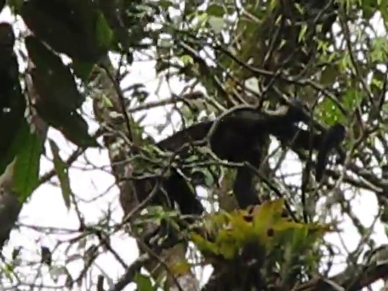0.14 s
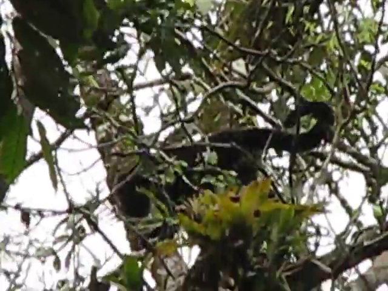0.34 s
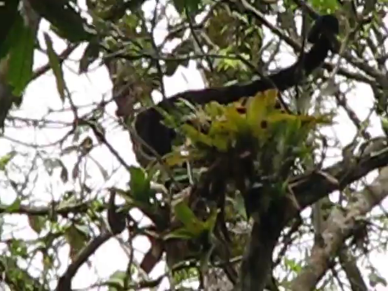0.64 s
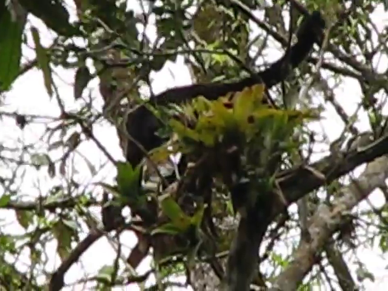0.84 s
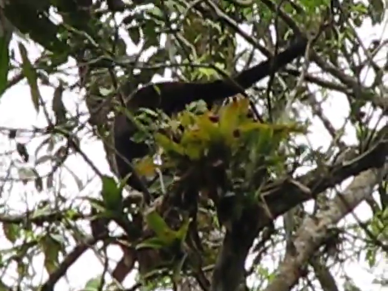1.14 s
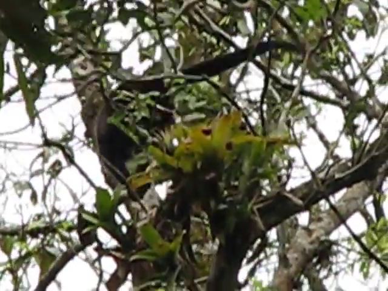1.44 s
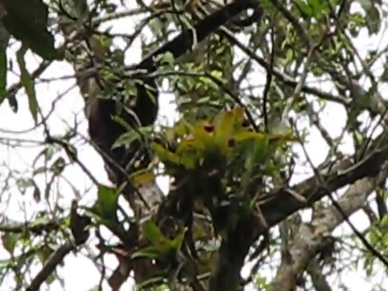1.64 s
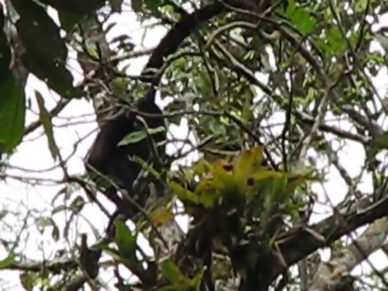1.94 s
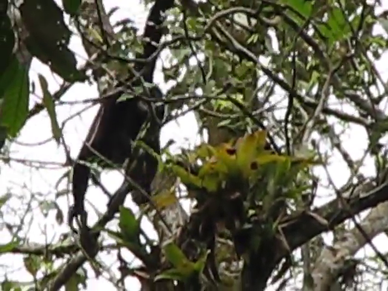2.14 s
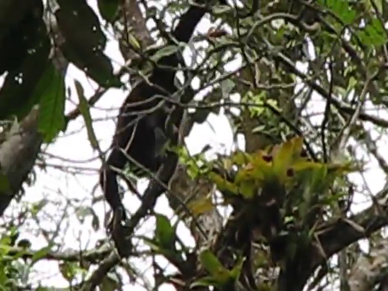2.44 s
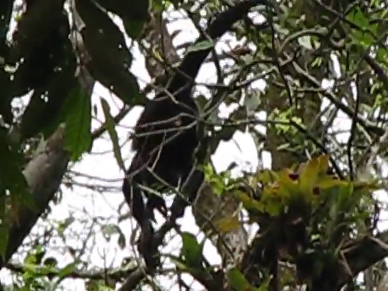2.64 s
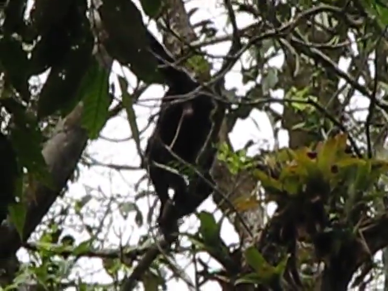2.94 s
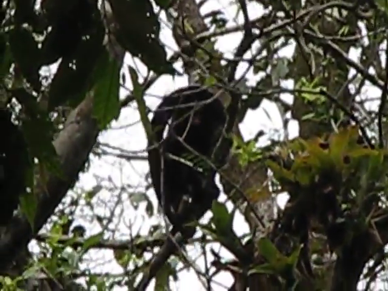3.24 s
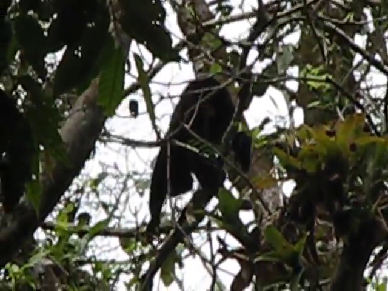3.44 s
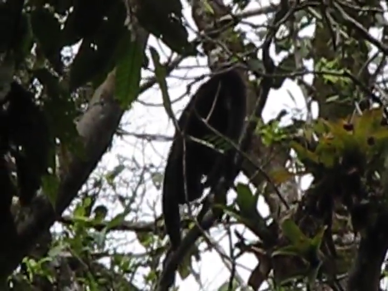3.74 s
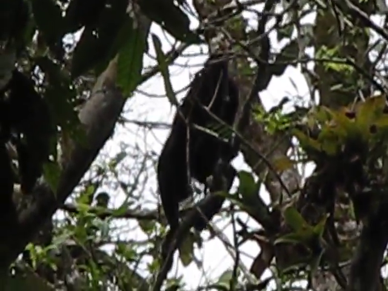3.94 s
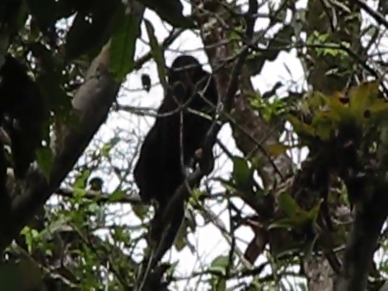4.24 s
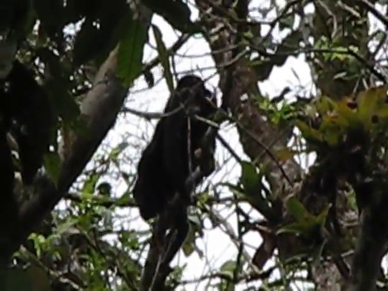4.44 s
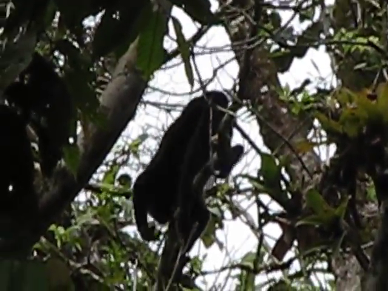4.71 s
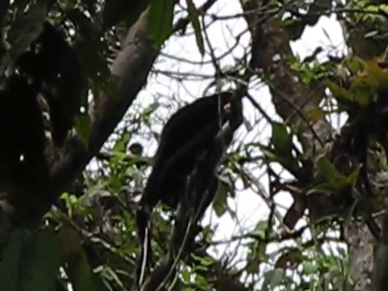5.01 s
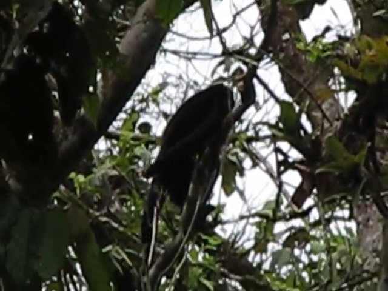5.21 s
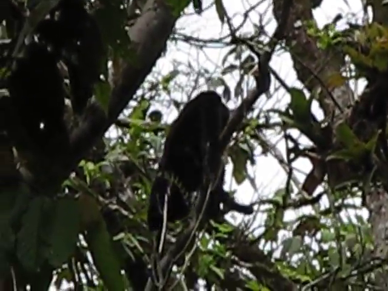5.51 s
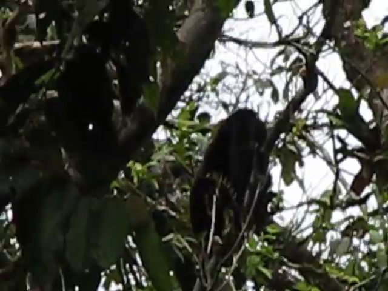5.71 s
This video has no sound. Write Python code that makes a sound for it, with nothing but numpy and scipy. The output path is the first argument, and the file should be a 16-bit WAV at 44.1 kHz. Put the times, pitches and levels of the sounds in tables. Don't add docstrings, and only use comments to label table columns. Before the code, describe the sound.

Throaty hollow monkey roars come in two bouts with gasps and whoops between, echoing through a forest of hissing cicadas, cricket and frog.

```python
import sys
import numpy as np
from scipy import signal
from scipy.fft import rfft, irfft, next_fast_len
from scipy.io import wavfile
from scipy.ndimage import uniform_filter1d, map_coordinates

SR = 44100
rng = np.random.default_rng(int(sys.argv[2]) if len(sys.argv) > 2 else 0)


def decibels_to_gain(level_db):
    exponent = np.asarray(level_db, float) / 20
    return 10 ** exponent


def generate_wav(signal):
    frames = np.transpose(np.atleast_2d(signal))
    scaled = np.clip(frames, -1, 1) * 32767
    pcm = np.round(scaled).astype(np.int16)
    wavfile.write(sys.argv[1], SR, pcm)


N = 258867


def unit(x):
    return x / np.sqrt(np.mean(x ** 2) + 1e-20)


def steady(x, span_s):
    power = abs(uniform_filter1d(x ** 2, int(span_s * SR)))
    return x / np.sqrt(power + 1e-20)


def along(points, hz):
    f, values = np.transpose(points)
    return np.interp(np.log(hz + 1), np.log(f + 1), values)


def curves(rows):
    times, *columns = np.transpose(rows)
    return [np.interp(np.arange(N) / SR, times, column) for column in columns]


def wobble(rate):
    knots = rng.standard_normal(int(N * rate / SR) + 4)
    return map_coordinates(knots, [np.arange(N) * rate / SR])


def filtered(x, response):
    m = next_fast_len(N + SR // 2)
    return irfft(rfft(x, m) * response(np.fft.rfftfreq(m, 1 / SR)), m)[..., :N]


def high_pass(x, hz, order):
    return filtered(x, lambda f: (1j * f / (hz + 1j * f)) ** order)


def modes(table):
    def response(f):
        total = 0
        for k, (centre, width, db) in enumerate(table):
            ring = 1j * f * width / (centre * centre - f * f + 1j * f * width)
            total = total + (-1) ** k * decibels_to_gain(db) * ring
        return total
    return response


def moving(x, hz, width_hz):
    turn = np.exp(2j * np.pi * np.cumsum(hz) / SR)
    pole = np.exp(-np.pi * width_hz / SR)
    low = signal.lfilter([1], np.convolve([1, -pole], [1, -pole]), x / turn)
    return (low * turn).real


# frequency_hz, likeness (1 same, 0 unrelated)
LEFT_RIGHT_LIKENESS = [(60, 1), (110, 0.93), (200, 0.96), (380, 0.94), (700, 0.77), (1290, 0.55),
                       (2380, 0.3), (4400, -0.062), (8120, -0.31), (15000, 0.03)]


def rush(spectrum, patchy_db):
    z = signal.stft(rng.standard_normal((2, N)), nperseg=512)[2]
    patches = uniform_filter1d(rng.standard_normal(z.shape[1:]), 6, 0)
    patches = uniform_filter1d(patches, 14, 1)
    pair = signal.istft(z * decibels_to_gain(patchy_db * unit(patches)), nperseg=512)[1][:, :N]

    def mid_side(hz):
        angle = np.arccos(np.clip(along(LEFT_RIGHT_LIKENESS, hz), -1, 1)) / 2
        return decibels_to_gain(along(spectrum, hz)) * [np.cos(angle), np.sin(angle)]

    mid, side = filtered(pair, mid_side)
    return unit(np.array([mid + side, mid - side]))


# frequency_hz, level_db (per Hz)
LEAVES_SPECTRUM = [(12, -55), (20, -1), (98, 0.5), (200, -1), (316, 1), (787, -1.5), (1130, -1.5),
                   (2210, -7), (2550, -4), (2880, -6.5), (4330, -3.5), (4650, 0), (5000, -4), (5500, -11),
                   (6200, -6.5), (8060, -56), (13600, -120)]
# frequency_hz, level_db (per Hz)
CICADA_SPECTRUM = [(3240, -65), (5600, -24), (7640, -2.5), (9400, 1), (10900, -4), (13700, -28.5),
                   (14800, -34), (15400, -31)]
# time_s, level_db
CICADA_LEVEL = [(0.0, -34.5), (0.46, -34), (2.26, -34.5), (5.87, -33.5)]
# pitch_hz, width_hz, level_db
DRONES = [
    (120.9, 4.9, -62),
    (2622, 44, -61),
]


def forest():
    cicada_db = curves(CICADA_LEVEL)[0] + 3.5 + 0.18 * wobble(4.42)
    cicadas = decibels_to_gain(cicada_db) * rush([(4000, -70), *CICADA_SPECTRUM], patchy_db=0.12)
    leaves = decibels_to_gain(-42.5 + 0.5 * wobble(1.75)) * rush(LEAVES_SPECTRUM, patchy_db=1.27)
    drones = np.zeros(N)
    for hz, width_hz, db in DRONES:
        ring = modes([(hz, width_hz, 0)])
        drones += decibels_to_gain(db) * unit(filtered(rng.standard_normal(N), lambda f: ring(f) ** 2))
    return cicadas + leaves + drones


# time_s, level_db
CRICKET_LEVEL = [(0, -47), (1.5, -51), (2.6, -49), (3.2, -53), (3.6, -56), (4.2, -54), (5.87, -54)]
CRICKET_RESTS = [.62, 1.22, 1.65, 1.97, 2.33, 2.67, 3.5, 4.08, 5.398]


def cricket():
    rest_s, pitch_hz = .024, 5020
    t = np.arange(N) / SR
    stroke = np.cumsum(52 * (1 + 0.0253 * wobble(2.5))) / SR
    pulses = np.sin(np.pi * stroke) ** 2 * decibels_to_gain(2.5 * wobble(45))
    scramble = 1.8 * wobble(70) + [.5 * wobble(30), .5 * wobble(30)]
    carrier = np.sin(2 * np.pi * pitch_hz * t + scramble)
    singing = np.prod([1 - 1.2 * np.exp(-((t - s) / rest_s) ** 4) for s in CRICKET_RESTS], axis=0)
    swaying = decibels_to_gain(.5 * wobble(3.74))
    song = unit(filtered(singing * pulses * carrier, modes([(5000, 99, 0)])))
    return decibels_to_gain(curves(CRICKET_LEVEL)[0]) * swaying * song


# time_s, rasps_so_far (count)
FROG_RHYTHM = [(.08, 0), (1.97, 10), (3.14, 16), (3.95, 20), (4.91, 25), (5.87, 30)]


def frog():
    beat = np.cos(np.pi * curves(FROG_RHYTHM)[0]) ** 6
    rasp = rush([(2800, -35), (3400, 6.5), (3900, 11.0), (4500, 9), (5000, -43)], patchy_db=0.5)
    return decibels_to_gain(-45 + wobble(2.15)) * beat * rasp * decibels_to_gain([[1.5], [-1.5]])


# start_s, peak_db
TWIG_SNAPS = [
    (4.327, -29),
]


def twig():
    x, t = np.zeros(N), np.arange(SR // 10) / SR
    for start, db in TWIG_SNAPS:
        burst = decibels_to_gain(db + 12.0 - 60 * t / 0.05) * rng.standard_normal(len(t))
        x[round(start * SR):][:len(t)] += burst
    wood = modes([(1950, 900, 0)])
    return filtered(x, lambda f: wood(f) ** 2)


def swell(start, end):
    at = np.arange(round(start * SR), round(end * SR))
    u = np.linspace(0, 1, len(at))
    return at, np.sin(np.pi * u ** .7) ** .8, u


# start_s, end_s, first_pitch_hz, width_hz, level_db
SQUEAKS = [
    (0, 0.094, 3440, 296, -46.5),
    (0.551, 0.683, 3810, 150.3, -48),
    (1.216, 1.381, 4210, 350, -43.5),
    (1.448, 1.86, 3680, 1097, -50.5),
]


def squeaks():
    x = np.zeros(N)
    for start, end, first_hz, width_hz, db in SQUEAKS:
        at, shape, u = swell(start, end)
        pitch = first_hz * 0.93 ** u
        x[at] += decibels_to_gain(db) * shape * unit(moving(rng.standard_normal(len(at)), pitch, width_hz))
    return x


# start_s, end_s, first_pitch_hz, level_db, favoured_hz
LINKS = [
    (0.122, 0.206, 261.4, -31, 880),
    (2.743, 2.85, 204.4, -43, 191),
    (4.41, 4.447, 172, -31.5, 840),
    (4.715, 4.775, 174.8, -33, 840),
    (5.022, 5.107, 257.5, -37, 520),
]
# start_s, end_s, first_pitch_hz, level_db, favoured_hz
WHOOPS = [
    (3.9, 3.985, 241, -29.5, 570.2),
    (4.37, 4.403, 245.3, -27.5, 777),
    (4.675, 4.728, 263.7, -27, 792),
]


def links():
    x, flutter, waver = np.zeros(N), wobble(40), wobble(25.54)
    notes = [(*row, 0.95 * row[2]) for row in LINKS]
    notes += [(*row, 285) for row in WHOOPS]
    for start, end, first_hz, db, favoured_hz, last_hz in notes:
        at, shape, u = swell(start, end)
        glide = np.minimum(1.78 * u, 1) ** 0.77
        pitch = (first_hz + (last_hz - first_hz) * glide) * (1 + 0.003 * flutter[at])
        phase = 2 * np.pi * np.cumsum(pitch) / SR
        for k in range(1, 6):
            weight = 0.3 * (k < 3) + 1 / (1 + ((k * pitch - favoured_hz) / 200) ** 4)
            x[at] += decibels_to_gain(db + 3.4 * waver[at]) * shape * weight * np.sin(k * phase)
    return x


def glottis(rate_hz, jitter, breath):
    cycle = np.cumsum(rate_hz * np.exp(jitter * wobble(90))) / SR
    slaps = (np.diff(np.floor(cycle), prepend=0) > 0) * decibels_to_gain(0.45 * rng.standard_normal(N))
    puffs = np.exp(-1.8 * (cycle % 1)) * rng.standard_normal(N)
    return np.sqrt(1 - breath) * unit(slaps) + np.sqrt(breath) * unit(puffs)


RISE_DB = 22


def breath_db(t, length, attack, sag, release):
    attack = max(attack, .005)
    rise = -RISE_DB * np.maximum(1 - t / attack, 0) ** 2
    held = np.clip(t - attack, 0, max(length - attack, 0))
    after = np.maximum(t - max(length, attack), 0)
    return rise - sag * held - release * after


# start_s, length_s, sac_db, mouth_db, sac_pitch_hz
BARKS = [
    (-.06, .115, -22, -26, 345),
    (.205, 0.1144, -15, -27, 347.9),
]
HOARSE = [
    (.45, .11, -22, -21.5, 373.6),
    (.745, 0.1203, -22, -27.5, 359.3),
    (.83, 0.14, -21.5, -25, 392.3),
    (1.2, 0.0787, -23, -29, 375.9),
]
SUNG = [
    (4.1, 0.0936, -17.5, -27, 332),
    (4.145, 0.099, -14, -26, 374),
    (4.46, 0.12, -12, -24, 374),
    (4.785, 0.16, -11, -23, 379),
    (5.11, 0.16, -11.5, -23, 370.4),
    (5.44, 0.1473, -11.5, -24, 378.1),
    (5.828, .15, -13.5, -26, 379.5),
]
GASPS = [
    (.13, .07, -33.5, -23, 380),
    (4.38, 0.042, -19, -33.5, 335.9),
    (4.695, 0.076, -22, -33, 327.5),
    (5.035, 0.051, -38.5, -25.5, 370),
]
AFTERS = [(.58, 0.078, -32, -31.5, 361.7), (1.52, .04, -47, -46, 384.8), (1.64, 0.09, -44, -44.5, 376),
          (1.85, 0.073, -51, -55, 380), (3.4, 0.0817, -45.5, -56, 350), (4.27, 0.0894, -28, -50, 371.7),
          (4.61, .05, -25.5, -63, 376.7), (5.34, 0.073, -37, -46, 363.3), (5.59, 0.04, -29, -32, 357),
          (5.68, 0.049, -35.5, -43, 368)]
YAPS = [
    (1.25, 0.1404, -20, -30, 366.2),
    (3.285, .07, -31, -41.5, 320.7),
    (3.58, 0.12, -26, -35, 344.3),
    (3.85, .11, -23, -31.5, 345.3),
]
# start_offset_hz, settling_s
SUNG_SCOOP = (-22, .03)
VOICES = [
    (BARKS, dict(sac=(.06, 16.4, 259.7), mouth=(0.054, 50, 250), rasp=(0.042, 60, 320), scoop=(8.034, 0.0382), clean=0.83, mouth_hz=711, opens=6.8, low_hz=2154, rasp_db=0.5, grows=0.13, hiss_db=-9.5)),
    (YAPS, dict(sac=(.06, 18.3, 264), mouth=(0.083, 22.4, 240), rasp=(0.12, 30, 280), scoop=(11.98, 0.0404), clean=0.41, mouth_hz=659, opens=3, low_hz=2055, rasp_db=-2.5, grows=1.5, hiss_db=-12)),
    (HOARSE, dict(sac=(0.049, -4.5, 218.4), mouth=(0.07, 59, 140), rasp=(0.095, 71, 260), scoop=(65, .06), clean=0.24, mouth_hz=739, opens=13, low_hz=2090, rasp_db=-3, grows=0.89, hiss_db=-1.5)),
    (SUNG, dict(sac=(0.089, 46, 303), mouth=(0.034, 93.6, 120), rasp=(0.067, 48, 188), scoop=SUNG_SCOOP, clean=0.98, mouth_hz=734.3, opens=6.6, low_hz=2028.5, rasp_db=-2.5, grows=2.9, hiss_db=-7.5)),
    (GASPS, dict(sac=(0.029, 40, 390), mouth=(0.01, 38, 140), rasp=(.03, 27.3, 102.5), scoop=(-17, 0.018), clean=.93, mouth_hz=854, opens=3.4, low_hz=2010, rasp_db=-3.5, grows=2.08, hiss_db=-12)),
    (AFTERS, dict(sac=(0.0302, 25, 200), mouth=(0.013, 90, 198), rasp=(0.037, 30, 130), scoop=(2.9, 0.021), clean=1, mouth_hz=762, opens=3, low_hz=2010, rasp_db=-3.5, grows=1.27, hiss_db=-6)),
]


def heaves():
    rasp_base_db, full_sac_db = -32, -15
    sings_hz_per_db = 1.5
    easy_db = -30
    lock_s, loose = .045, .3
    power, colour = np.full((4, N), 1e-12), np.zeros((4, N))
    for rows, voice in VOICES:
        scoop_hz, settle_s = voice["scoop"]
        for start, length, sac_top_db, mouth_top_db, hz in rows:
            first = max(round((start - .1) * SR), 0)
            last = min(round((start + length + .5) * SR), N)
            at = slice(first, last)
            t = np.arange(first, last) / SR - start
            sac_db = sac_top_db + breath_db(t, length, *voice["sac"])
            mouth_db = mouth_top_db + breath_db(t, length, *voice["mouth"])
            rasp_top_db = rasp_base_db + voice["rasp_db"] + voice["grows"] * min(sac_top_db - full_sac_db, 0)
            rasp_db = rasp_top_db + breath_db(t, length, *voice["rasp"])
            gains = decibels_to_gain(2 * np.array([sac_db, mouth_db, rasp_db, rasp_db + voice["hiss_db"]]))
            pitch = hz + sings_hz_per_db * np.maximum(sac_db - sac_top_db, -RISE_DB)
            pitch = pitch + scoop_hz * np.exp(-np.maximum(t, 0) / abs(settle_s))
            clean = loose + (voice["clean"] - loose) * np.clip((t - lock_s) * 40, 0, 1)
            opening = voice["mouth_hz"] + voice["opens"] * np.maximum(mouth_db - easy_db, 0)
            power[:, at] += gains
            colour[:, at] += [gains[0] * pitch, gains[0] * clean, gains[1] * opening,
                              gains[2] * voice["low_hz"]]
    sac_db, mouth_db, rasp_db, hiss_db = 10 * np.log10(power)
    sac_hz, clean, mouth_hz, low_hz = colour / power[[0, 0, 1, 2]]
    mouth_hz = mouth_hz * (1 + 0.028 * wobble(14))
    low_hz = low_hz * (1 + .004 * wobble(9))
    high_hz = 3170 * (1 + .008 * wobble(9))
    return sac_hz, sac_db, np.clip(clean, 0, 1), mouth_hz, mouth_db, low_hz, high_hz, rasp_db, hiss_db


CATCHES = [.285, 3.66, 4.185, 4.561, 4.882, 5.17]
# pitch_hz, width_hz, level_db
THROAT = [(302, 170, -0.5), (452, 106, 1.5), (530.5, 42, 6.5), (643, 13.7, 3.5), (860, 65, -1.5),
          (1162, 17, 1)]
# pitch_hz, width_hz, level_db
NOSE = [(1360, 45, 0), (1200, 160, -13)]
# pitch_hz, width_hz, level_db
HISS = [(4100, 24, 7.5), (4720, 740, 4.5), (5340, 860, 7.5)]
# pitch_hz, width_hz, level_db
HOARSE_HISS = [(4260, 370, 1.5), (4820, 350, 7), (5600, 640, 1.5)]


def howler():
    sac_hz, sac_db, clean, mouth_hz, mouth_db, low_hz, high_hz, rasp_db, hiss_db = heaves()
    t = np.arange(N) / SR
    hoarse_bout = t < 2.5
    source = glottis(rate_hz=140, jitter=.5, breath=0.89)

    phase = 2 * np.pi * np.cumsum(sac_hz * (1 + 0.00532 * wobble(35))) / SR
    tone = np.sqrt(2) * (np.sin(phase) + decibels_to_gain(-31) * np.sin(2 * phase)) * decibels_to_gain(0.4 * wobble(30))
    tone *= np.prod([np.tanh((t - s) / .008) for s in CATCHES], axis=0)
    rumble = steady(moving(source, sac_hz, width_hz=65), .028)
    sac = np.sqrt(clean) * tone + np.sqrt(1 - clean) * rumble

    throat, broad = modes(THROAT), modes([(560, 800, 0)])
    roar = steady(filtered(source, lambda hz: throat(hz) * broad(hz) ** 3), 0.023)
    mouth = 0.59 * steady(moving(source, mouth_hz, width_hz=82), 0.074) + 0.56 * roar
    for start, end, *_ in LINKS + WHOOPS:
        at, shape, _ = swell(start, end)
        mouth[at] *= 1 - .85 * np.minimum(2 * shape, 1)

    nose = filtered(filtered(source, modes(NOSE)), modes([(1360, 1900, 0)]))
    nose = steady(nose, 0.17)
    nose_db = 0.69 * mouth_db + 0.44 * rasp_db - 5.5

    tight = 0.73 * unit(moving(source, low_hz, width_hz=71))
    tight += 0.8 * unit(moving(source, high_hz, width_hz=170))
    loose = 0.37 * unit(moving(source, low_hz, width_hz=210))
    loose += 0.21 * unit(moving(source, high_hz, width_hz=200))
    rasp = np.where(hoarse_bout, loose, tight)

    wide_lips, teeth = modes(HOARSE_HISS), modes(HISS)
    hoarse_hiss = unit(filtered(source, lambda hz: wide_lips(hz) ** 2))
    plain_hiss = unit(filtered(source, lambda hz: teeth(hz) ** 2))
    hiss = np.where(hoarse_bout, hoarse_hiss, plain_hiss)
    hiss_gain = np.sqrt(np.maximum(decibels_to_gain(2 * hiss_db) - decibels_to_gain(2 * -47), 0))

    rest = decibels_to_gain(mouth_db + 2.5) * mouth + decibels_to_gain(nose_db) * nose
    rest = rest + decibels_to_gain(rasp_db - 2.5) * rasp + hiss_gain * hiss
    return decibels_to_gain(sac_db + 0.02) * sac, rest


# frequency_hz, decay_s (to fall 60 dB)
TREE_DECAY = [(200, 0.48), (400, 0.43), (1000, 0.4), (5000, 0.46)]


def echoes(x, alike):
    hz, t, z = signal.stft(rng.standard_normal((2, SR // 2)), SR, nperseg=256)
    fading = decibels_to_gain(-60 * t / along(TREE_DECAY, hz)[:, None])
    tail = signal.istft(z * fading, SR, nperseg=256)[1]
    tail = tail + alike * tail[::-1]
    tail = tail / np.linalg.norm(tail[0])
    delayed = np.pad(x, (500, 0))[None]
    return signal.fftconvolve(delayed, tail, axes=1)[:, :N]


# time_s, left_minus_right_db
SAC_PAN = [(0, 2), (3.5, 2.2), (4.5, 2.5), (5.87, 2.5)]


def scene():
    sac, rest = high_pass(np.array(howler()), 120, 4)
    rest = rest + links() + squeaks() + twig()
    lean_db = curves(SAC_PAN)[0] / 2
    leafy = filtered(rest, lambda f: decibels_to_gain(along([(600, -11), (1200, -9), (3000, 1.5)], f)))
    scattered = decibels_to_gain(-15) * echoes(sac, alike=1.0) + echoes(leafy, alike=0.068)
    monkey = sac * decibels_to_gain([lean_db, -lean_db]) + rest + scattered
    return monkey + cricket() + frog() + forest()


def low_pass(x):
    return signal.sosfilt(signal.butter(12, 15600, fs=SR, output="sos"), x)


def record(dry):
    mix = high_pass(dry, 35, 2)
    return low_pass(mix)


dry = scene()
out = record(dry)
generate_wav(out)
```